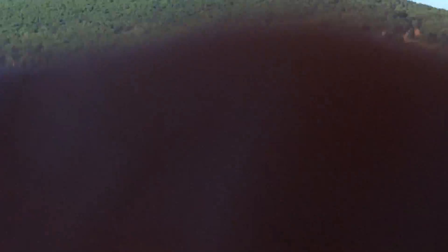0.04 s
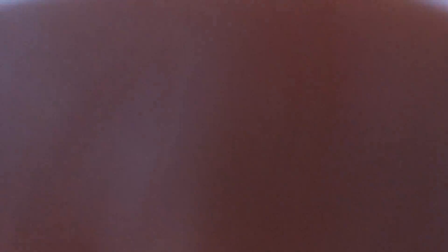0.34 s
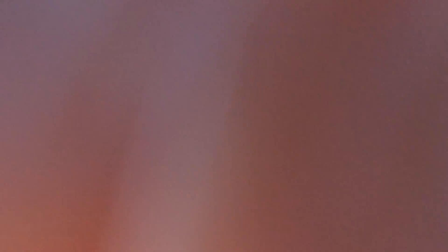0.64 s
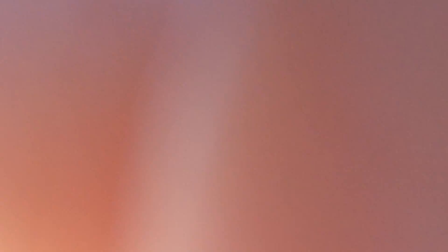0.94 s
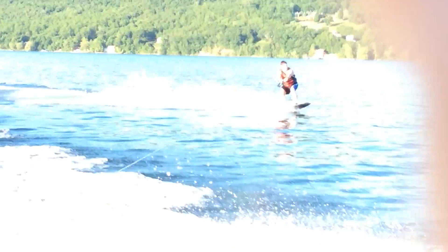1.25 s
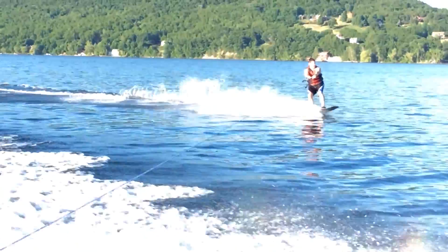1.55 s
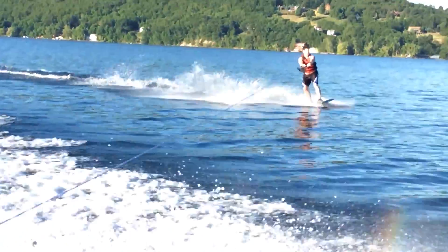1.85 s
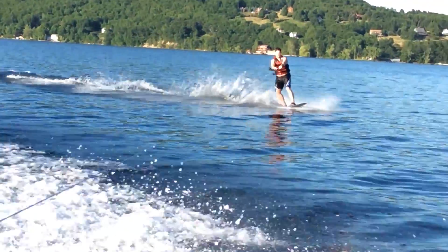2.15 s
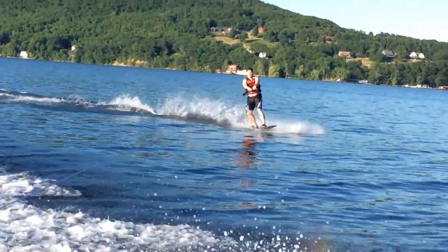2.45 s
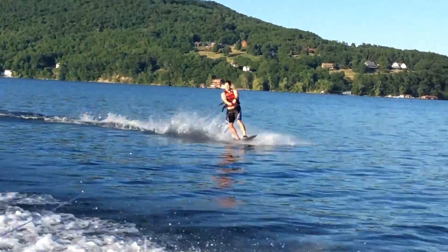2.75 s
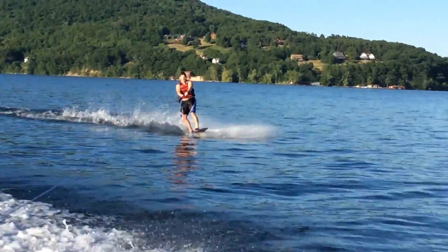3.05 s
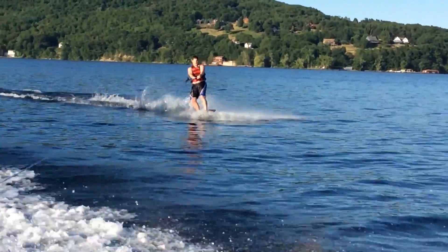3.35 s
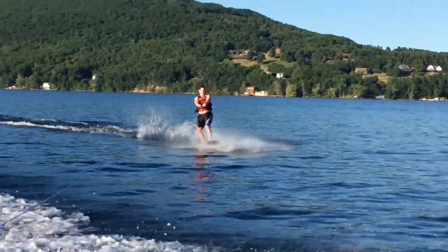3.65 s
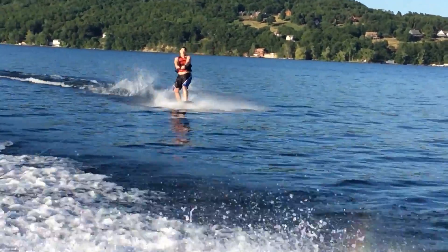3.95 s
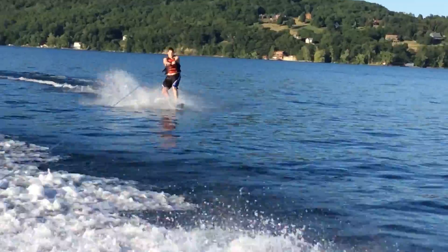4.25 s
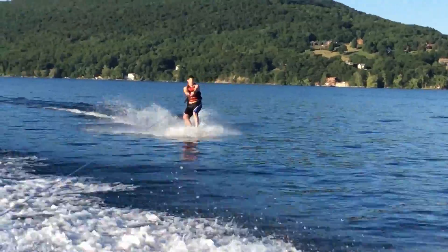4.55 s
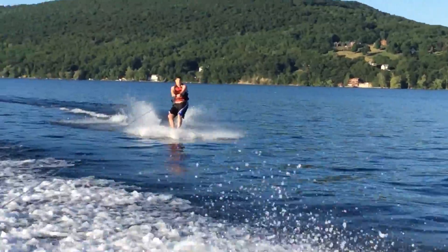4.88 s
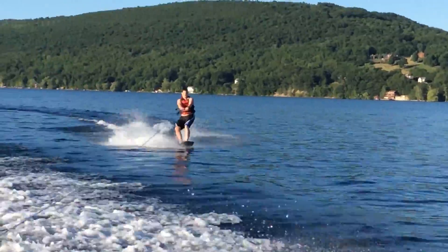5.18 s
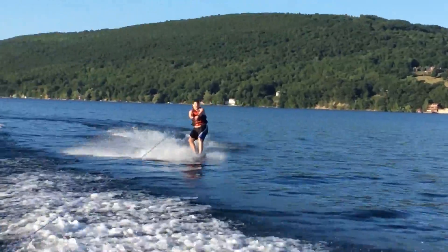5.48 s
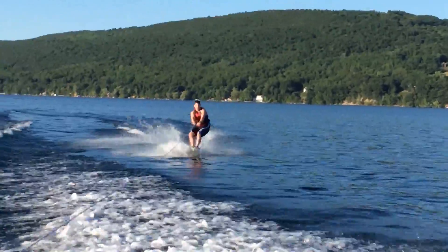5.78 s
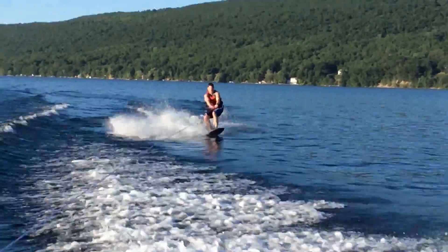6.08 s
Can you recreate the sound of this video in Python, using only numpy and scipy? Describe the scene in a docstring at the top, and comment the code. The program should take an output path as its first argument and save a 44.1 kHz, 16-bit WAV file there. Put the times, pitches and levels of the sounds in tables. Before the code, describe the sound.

Strong wind rumbles and thumps on a bare microphone at the back of a motorboat towing a skier across a lake. The gusts are roughest in the first two seconds, fluttering and tearing into crackle, then keep coming in shorter bursts. Underneath, the engine drones at one speed, the wake rushes and fine spray hisses. A tiny tick comes with a last hard gust near the end.

```python
"""Wind on a bare microphone at the stern of a motorboat towing a water-skier across a lake.
Large eddies rumble and buffet the diaphragm; small ones flutter and tear into crackle in the gusts.
Beneath it the engine drones at steady speed, the wake rushes and spray hisses.
One tick sounds near the end; a limiter holds the peaks."""
import sys
import numpy as np
from scipy import signal
from scipy.fft import rfft, irfft
from scipy.io import wavfile
from scipy.ndimage import uniform_filter1d, minimum_filter1d

SR = 44100
rng = np.random.default_rng(int(sys.argv[2]) if len(sys.argv) > 2 else 0)


def int16_out(signal):
    """Quantize to a 16-bit WAV file."""
    q = np.round(np.clip(np.atleast_2d(signal).T, -1, 1) * 32767)
    wavfile.write(sys.argv[1], SR, q.astype(np.int16))


N = 269892
TIME = np.arange(N) / SR

# spectrum of tearing air: (frequency [Hz], density [dB])
CRACKLE_SPECTRUM = [(600, 10), (1200, 9), (2000, 3.5), (3000, -5.5), (4500, -8), (7000, -16.5),
                    (10000, -21), (15000, -29)]


def from_db(db):
    """Decibels to gain."""
    return 10 ** (np.asarray(db) / 20)


def unit_rms(x):
    """Scale to rms 1."""
    return x / np.sqrt(np.mean(x ** 2) + 1e-20)


def curves(rows):
    """Interpolate each column over the first, time [s]."""
    times_s, *columns = np.transpose(rows)
    return [np.interp(TIME, times_s, column) for column in columns]


def around(at_s, reach_s):
    """Samples within reach_s of at_s."""
    return slice(max(int((at_s - reach_s) * SR), 0), int((at_s + reach_s) * SR))


def drift(cutoff_hz):
    """Smooth random wander, rms 1."""
    hz = np.arange(N // 2 + 1) * SR / N
    return unit_rms(irfft(rfft(rng.standard_normal(N)) / (1 + (hz / cutoff_hz) ** 4), N))


def noise(spectrum):
    """Coloured noise, rolled off beyond the spectrum's ends; rms 1."""
    points_hz, db = np.transpose(spectrum)
    hz = np.arange(N // 2 + 1) * SR / N + 1e-3
    rolloff = 1 / (1 + (points_hz[0] / hz / 2) ** 4) / (1 + (hz / points_hz[-1] / 2) ** 4)
    gain = from_db(np.interp(np.log(hz), np.log(points_hz), db)) * rolloff
    return unit_rms(irfft(rfft(rng.standard_normal(N)) * gain, N))


def evened(x, span_s):
    """Level out slow swells, keep the fast grain."""
    power = uniform_filter1d(x ** 2, max(int(span_s * SR), 2))
    return x / np.sqrt(uniform_filter1d(power, max(int(span_s * SR / 2), 2)) + 1e-6)


def spray(patter_db):
    """Sheets of spray from the hull hiss as countless droplets land."""
    # spray strength: (time [s], hiss [dB], relative mist level [dB])
    levels = [(0.0, -40.5, -49), (0.42, -34, -51), (0.71, -44, -49.5), (1.35, -42.5, -45),
              (1.72, -49, -50.5), (1.89, -37, -42), (2.05, -38.5, -43), (2.21, -31.5, -35),
              (2.26, -38.5, -42), (2.58, -38.5, -40.5), (2.78, -42, -44.5), (3.02, -37, -40.5),
              (3.42, -37.5, -41.5), (3.59, -42, -48), (3.99, -43.5, -49.5), (4.82, -38.5, -44.5),
              (5.8, -39, -44.5), (6.05, -44.5, -49)]
    # droplet and fine mist spectra: (frequency [Hz], density [dB])
    hiss_spectrum = [(4000, -14), (6500, -12), (7400, -11.5), (7850, -5.5), (8150, 0.5), (8800, -1.5),
                     (9400, 0), (10300, -7), (12000, -13.5), (15000, -40)]
    mist_spectrum = [(4000, -11.5), (7000, -28), (9000, -3), (11000, -1), (12500, -2), (13400, -3),
                     (14200, -5.5), (15400, -6.5)]
    hiss_db, mist_db = curves(levels)
    hiss = from_db(hiss_db) * noise(hiss_spectrum)
    mist = from_db(mist_db + 3.5) * noise(mist_spectrum)
    return (hiss + mist) * from_db(patter_db * drift(90))


def engine(crank_hz, wander, waver_db):
    """Crankshaft orders under steady load, each wavering in the moving air."""
    # drone partials: (order [x crank rate], relative level [dB])
    orders = [(4, -35.5), (6, -42), (12, -44), (13, -68), (15, -56.5), (20, -51.5), (23, -49), (24, -49.5),
              (25, -48), (30, -55), (43, -59)]
    turns = np.cumsum(crank_hz * (1 + wander * drift(2.8))) / SR
    drone = np.zeros(N)
    for order, db in orders:
        amplitude = np.sqrt(2) * from_db(db - 2.0 + waver_db * drift(30))
        drone += amplitude * np.sin(2 * np.pi * (order * turns + rng.random()))
    return drone


def wake(level_db, churn_db):
    """Churning water rushes steadily astern."""
    # wake spectrum: (frequency [Hz], density [dB])
    spectrum = [(80, 5), (170, -4), (280, -3), (450, -13), (650, -34), (900, -21), (1250, -17.5),
                (1750, -18.5), (2400, -27.5), (3200, -24.5), (4300, -32), (5700, -38), (7200, -32.5),
                (12000, -48)]
    return from_db(level_db + churn_db * drift(30)) * noise(spectrum)


def tick(at_s, level_db, ring_hz, decay_s):
    """One short ringing tick close to the microphone."""
    age_s = np.maximum(TIME - at_s, 0)
    return from_db(level_db) * np.exp(-age_s / decay_s) * np.sin(2 * np.pi * ring_hz * age_s)


def gust(start_s, hold_s, slowness=1, attack_s=0.022, release_s=0.02):
    """Envelope of one gust; slowness stretches its Gaussian flanks."""
    early = np.maximum(start_s - TIME, 0) / (attack_s * slowness)
    late = np.maximum(TIME - start_s - hold_s, 0) / (release_s * slowness)
    return np.exp(-early ** 2 - late ** 2)


def airflow(lull_s):
    """Gusts add power to the airstream; returns rumble, flutter and tearing (extra crackle) in dB."""
    # flow between gusts: (time [s], rumble [dB], flutter [dB])
    airstream = [(0.0, -26, -26), (0.41, -21.5, -26), (0.68, -29.5, -25), (0.83, -35, -29),
                 (1.0, -26.5, -37), (1.23, -18, -23), (1.41, -11.5, -20), (1.57, -17, -18),
                 (1.79, -18.5, -35), (1.99, -24, -28), (2.42, -17.5, -30.5), (3.63, -21.5, -31),
                 (4.04, -16, -30), (4.33, -22.5, -34), (4.82, -23, -30.5), (5.1, -24.5, -32.5),
                 (5.78, -23, -28), (6.12, -17.5, -30)]
    # brief drops in that flow: (time [s], depth [dB])
    lulls = [(1.925, 8), (4.32, 9), (6.0, 21)]
    # gusts on top: (start [s], hold [s], rumble [dB], flutter [dB], tearing [dB])
    gusts = [(0.0, 0.02, -17.5, -8, 5), (0.661, 0.16, -16.5, -19.5, -1), (0.732, 0.072, -15, -13.5, 8.5),
             (0.868, 0.14, -17, -12, 7.5), (1.235, .02, -32, -21, 1), (1.398, 0.15, -24, -20.5, -1),
             (1.597, 0.14, -27, -24.5, -16), (2.229, .03, -13.5, -21.5, -17),
             (2.588, 0.087, -13, -20.5, -8), (3.05, 0.059, -16, -29.5, -16), (3.319, 0.019, -16, -21, 1),
             (3.899, 0.049, -21.5, -12, -2), (3.97, 0.084, -20, -23.5, -5),
             (4.193, 0.0095, -12, -14.5, -26), (5.454, 0.059, -18, -38, -10), (5.607, 0.015, -32, -24.5, 7),
             (5.844, 0.058, -16, -18.5, -7)]
    lull_db = sum(db * np.exp(-((TIME - at_s) / lull_s) ** 2) for at_s, db in lulls)
    rumble_power, flutter_power = from_db(curves(airstream) - lull_db) ** 2
    tearing_sum = np.zeros(N)
    for start_s, hold_s, rumble_db, flutter_db, tearing_db in gusts:
        # large eddies build and die more slowly
        rumble_power += (from_db(rumble_db) * gust(start_s, hold_s, slowness=2.04)) ** 2
        gust_power = (from_db(flutter_db) * gust(start_s, hold_s)) ** 2
        flutter_power += gust_power
        tearing_sum += gust_power * tearing_db
    return 10 * np.log10(rumble_power), 10 * np.log10(flutter_power), tearing_sum / flutter_power


def slaps(body_s, edge_s):
    """Sharp puffs of air, their crackling edge briefer than their body."""
    # puffs: (time [s], body [dB], edge [dB])
    puffs = [(0.641, -9.5, -34), (0.723, -9, -20.5), (0.787, -18, -21), (0.806, -6, -14),
             (0.838, -21, -14.5), (0.867, -9, -12), (0.934, -6, -22), (1.24, -10, -22), (1.396, -16, -24),
             (1.427, -6.5, -20.5), (1.698, -16, -18.5), (1.816, -11.5, -26), (2.635, -8.5, -38),
             (2.766, -18, -29), (3.11, -17, -47), (3.454, -9.5, -33), (3.899, -9.5, -28),
             (4.025, -13.5, -43), (4.191, -12, -22), (4.83, -13, -46), (5.33, -12, -25.5),
             (5.655, -12, -35), (5.768, -12, -37), (5.844, -9, -33), (5.885, -15.5, -23.5)]
    # body spectrum: (frequency [Hz], density [dB])
    puff_spectrum = [(250, 5), (450, 1), (700, -2), (1200, -13.5), (3000, -36.5)]
    body, edge = np.zeros(N), np.zeros(N)
    for at_s, body_db, edge_db in puffs:
        near = around(at_s, 0.03)
        offset_s = TIME[near] - at_s
        body[near] += from_db(body_db) * np.exp(-.5 * (offset_s / body_s) ** 2)
        edge[near] += from_db(edge_db) * np.exp(-.5 * (offset_s / edge_s) ** 2)
    body *= evened(noise(puff_spectrum), span_s=0.0043)
    edge *= evened(noise(CRACKLE_SPECTRUM), span_s=0.0018)
    return body + edge


def lesser_eddies(rumble_db, flutter_db, count, calm_hz=121, calm_db=-28.5, db_per_octave=25.5):
    """Chance eddies scale with the rumble and swing quicker in fast flow; rows for buffets()."""
    jitter, weakness, pace = rng.random((count, 3)).T
    at_s = (np.arange(count) + jitter) * TIME[-1] / count
    peak_db = np.interp(at_s, TIME, rumble_db) + 12 - 7 * weakness
    octaves = (np.interp(at_s, TIME, flutter_db) - calm_db) / db_per_octave + pace - .5
    return list(zip(at_s, peak_db, calm_hz * 2 ** octaves))


def buffets(lesser, width_cycles):
    """Each passing eddy pushes and pulls the diaphragm for about one swing."""
    # large eddies hitting the port: (time [s], envelope peak [dB], swing [Hz])
    large = [(0.376, -1.5, 109), (0.604, -4, 99), (0.673, -3, 176), (0.84, 2.5, 158), (0.874, 1.5, 216),
             (1.485, 1, 93), (1.516, -1.5, 108), (1.54, -1.5, 115), (1.623, -2, 194), (2.25, -3, 118),
             (2.348, -6, 85.6), (2.68, -4, 112), (3.342, -0.5, 143), (3.407, -5, 118), (3.452, -4, 173),
             (3.652, -3, 112), (3.928, -4, 102), (4.665, -5, 94), (4.858, -2.5, 107), (4.932, -4.5, 93),
             (4.962, -4, 95), (5.317, -5, 123), (5.756, -6, 125), (5.892, 4.5, 112), (5.949, -1.5, 174)]
    eddies = large + lesser
    phases = np.pi * rng.uniform(-0.98, 1, len(eddies))
    pressure = np.zeros(N)
    for (at_s, peak_db, swing_hz), phase in zip(eddies, phases):
        near = around(at_s, 0.04)
        cycles = (TIME[near] - at_s) * swing_hz
        envelope = from_db(peak_db) * np.exp(-.5 * (cycles / width_cycles) ** 2)
        pressure[near] += envelope * np.sin(2 * np.pi * cycles + phase)
    return pressure


def wind(lump_db, flutter_burst_db, crackle_burst_db, crackle_slope, pivot_db):
    """Large eddies rumble; small ones come in bursts, and the smallest grow fastest with the gust."""
    # large and small eddy spectra: (frequency [Hz], density [dB])
    rumble_spectrum = [(20, -35), (32, -21), (50, 1), (75, 3), (110, 1), (160, -2.5), (230, -8.5),
                       (350, -11), (700, -53)]
    flutter_spectrum = [(120, -8), (200, 4.5), (330, 1), (500, 5), (750, -2), (1100, -9.5), (1700, -18.5),
                        (2800, -30), (6000, -71)]
    rumble_db, flutter_db, tearing_db = airflow(lull_s=0.022)
    rumble_gain = from_db(rumble_db - 0.98 + lump_db * drift(22.4))
    rumble = rumble_gain * evened(noise(rumble_spectrum), span_s=0.041)
    # flow breaks away from the port in spells of a few milliseconds
    bursts = np.clip(.6 * drift(90) + .8 * drift(380), -2.2, 2.2)
    grain = noise(flutter_spectrum) * from_db(flutter_burst_db * bursts)
    flutter = from_db(flutter_db) * evened(grain, span_s=0.15)
    crackle_db = pivot_db + crackle_slope * (flutter_db - pivot_db) + tearing_db - 12.5
    crackle = from_db(crackle_db) * noise(CRACKLE_SPECTRUM) * unit_rms(from_db(crackle_burst_db * bursts))
    puffs = slaps(body_s=0.0036, edge_s=0.0026)
    thumps = buffets(lesser_eddies(rumble_db, flutter_db, count=36), width_cycles=0.44)
    return rumble + flutter + crackle + puffs + thumps


def scene():
    """Wind at the microphone over boat and water, mono."""
    mix = wind(lump_db=3.5, flutter_burst_db=4.5, crackle_burst_db=6.5, crackle_slope=1.41, pivot_db=-8)
    mix += engine(crank_hz=50.1, wander=0.001036, waver_db=2.0)
    mix += wake(level_db=-28.0, churn_db=1.43)
    mix += spray(patter_db=0.52)
    mix += tick(at_s=5.884, level_db=-12, ring_hz=2450, decay_s=0.0013)
    return mix[None]


def limiter(x, ceiling_db, release_db_per_s):
    """Gain drops just ahead of each peak and recovers at a steady rate."""
    over_db = np.maximum(20 * np.log10(np.abs(x) + 1e-9) - ceiling_db, 0)
    ramp_db = release_db_per_s * TIME
    cut_db = np.maximum.accumulate(over_db + ramp_db) - ramp_db
    return x * from_db(uniform_filter1d(minimum_filter1d(-cut_db, size=89), size=89))


def record(dry):
    """Peak limiter, then a steep low-pass."""
    cutoff_hz = 15250
    limited = limiter(dry[0], ceiling_db=-.5, release_db_per_s=90)
    lowpass = signal.ellip(12, .1, 90, cutoff_hz, fs=SR, output="sos")
    return signal.sosfilt(lowpass, limited)[None]


dry = scene()
out = record(dry)
int16_out(out)
```